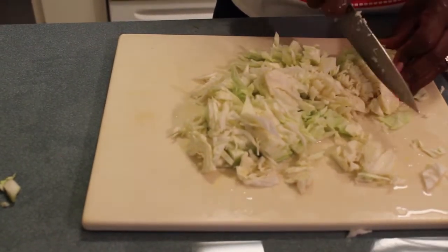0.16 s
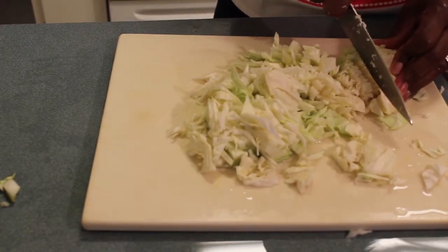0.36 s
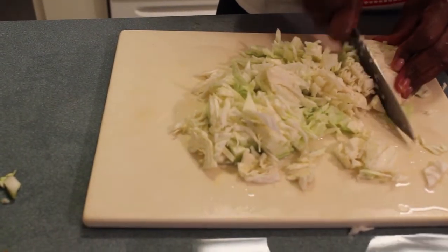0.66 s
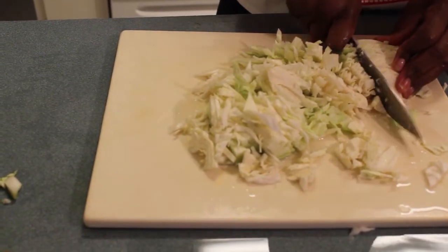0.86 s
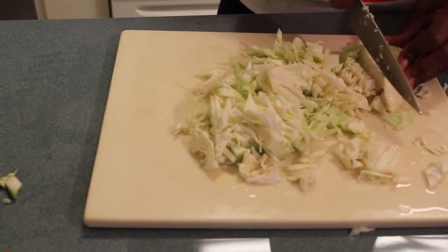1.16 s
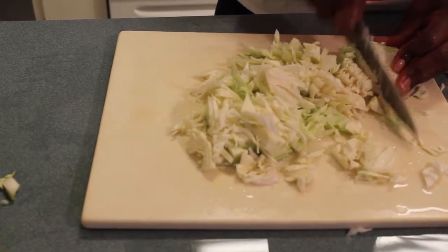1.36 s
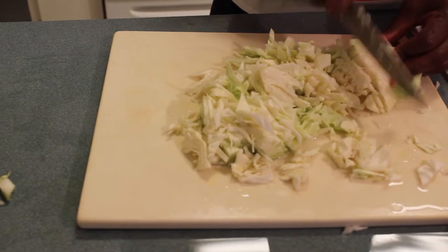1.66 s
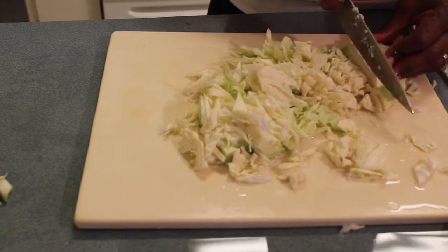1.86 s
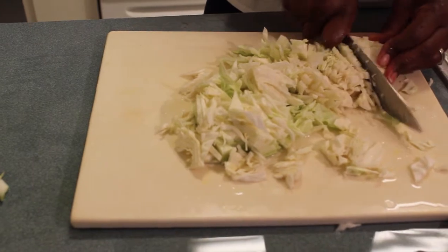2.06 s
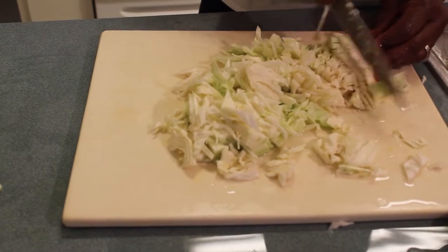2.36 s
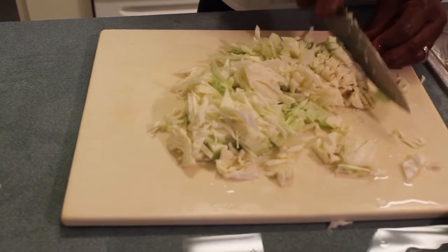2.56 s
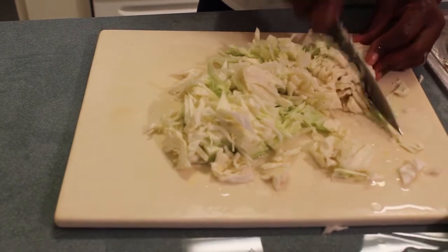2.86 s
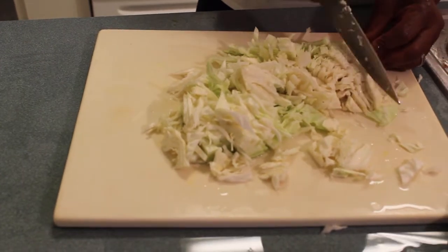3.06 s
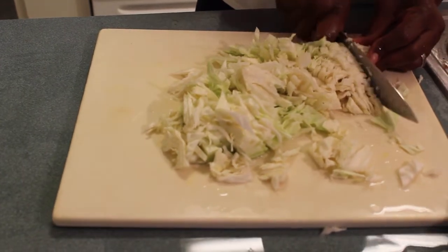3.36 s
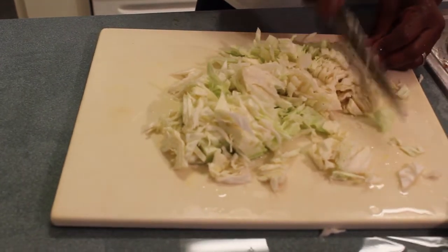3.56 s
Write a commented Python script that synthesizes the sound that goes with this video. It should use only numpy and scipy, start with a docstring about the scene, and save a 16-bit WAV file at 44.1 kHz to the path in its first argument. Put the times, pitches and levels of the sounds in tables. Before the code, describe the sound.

Knife slicing cabbage on a plastic board, crisp crunches, soft thumps, then two loud board knocks.

```python
"""Five crunchy strokes of a large knife through cabbage on a plastic board, close by, in a kitchen with a fan.
Leaves crunch as swarms of filtered clicks, and the board rumbles and booms with clicks and dying sines.
Light taps, grinding, a singing blade and rustling shreds fill in the detail.
Strokes four and five end in hard knocks: cracks, clacks and ringing that overload the microphone
and make its automatic gain turn down."""
import sys
import numpy as np
from scipy import signal
from scipy.fft import rfft, irfft
from scipy.io import wavfile
from scipy.ndimage import uniform_filter1d

SR = 44100
rng = np.random.default_rng(int(sys.argv[2]) if len(sys.argv) > 2 else 0)


def int16_out(signal):
    """Quantize to a 16-bit WAV file."""
    q = np.round(np.clip(np.atleast_2d(signal).T, -1, 1) * 32767)
    wavfile.write(sys.argv[1], SR, q.astype(np.int16))


N = 163170  # length in samples, 3.7 s

# Levels in the tables are relative: filters, mix levels, the room and the microphone gain follow.
# One list per knife stroke. Each row: time in seconds, leaf crunch in dB, shove on the board in dB.
STROKES = [
    [(0.46, -47, -44), (0.538, -30, -21), (0.568, -36, -21), (0.584, -27.5, -26.5), (0.678, -30, -24.5),
     (0.712, -26.5, -43), (0.776, -26.5, -29), (0.804, -41.5, -16.5), (0.84, -46, -38)],
    [(1.28, -56, -21), (1.29, -38.5, -31), (1.346, -35, -32.5), (1.382, -23, -17), (1.432, -15.5, -25.5),
     (1.454, -24.5, -19.5), (1.484, -25, -32), (1.514, -40, -17.5), (1.54, -54, -26)],
    [(1.92, -41.5, -40), (1.95, -36, -38), (1.962, -44.5, -29), (2.002, -29, -34), (2.014, -17.5, -30),
     (2.044, -19.5, -20.5), (2.106, -18.5, -21.5), (2.126, -32, -35), (2.18, -47, -35)],
    [(2.52, -42, -40), (2.54, -32, -49), (2.564, -28, -35), (2.574, -31.5, -21.5), (2.602, -29, -34),
     (2.606, -22, -36), (2.632, -24, -16.5), (2.698, -17.5, -24)],
    [(3.19, -63, -36), (3.21, -31.5, -30.5), (3.244, -21.5, -23), (3.26, -17.5, -17), (3.276, -18.5, -16.5),
     (3.316, -19, -21), (3.36, -18, -19), (3.388, -19, -31), (3.398, -16.5, -26)],
]
# Tone of the snapping leaves. Each row: frequency in Hz, level in dB.
LEAF_TONE = [(240, -10.5), (400, -5), (515, -18), (580, -3), (625, -5.5), (962, -12.5), (1530, -1),
             (1940, -6.5), (2120, 3), (2490, 0), (3210, 1), (3950, -3.5), (7280, 2), (8320, -3),
             (14000, -31)]
# Edges of the pitch bands for fibres of different sizes, in Hz.
FIBRE_BANDS_HZ = [200, 900, 1700, 2600, 3700, 5000, 6300, 7600, 9500, 15500]
# Tone of the shoved board. Each row: frequency in Hz, level in dB.
BOARD_TONE = [(20, -30), (32, -32), (48, -15.5), (70, -11.5), (105, -6.5), (124, 4.5), (136, 4), (150, 1),
              (175, -12.5), (215, -14.5), (260, -6), (320, -16.5), (600, -23), (1500, -59)]
# Hard knocks on the bare board. Each row: start in seconds, crack in dB, clack of the edge in dB,
# ring of the board in dB, thump in dB.
KNOCKS = [(2.7039, 28, 3, -17, -14), (3.4033, 31, 5, 4, -5.5)]
# Tone of the sharp crack. Each row: frequency in Hz, level in dB.
CRACK_TONE = [(200, -34.5), (500, -5.5), (800, -1), (1200, -7), (1700, -4.5), (2700, 4), (3400, -13),
              (5200, -19), (8000, -19), (15000, -47)]
# Tone of the edge's clack. Each row: frequency in Hz, level in dB.
CLACK_TONE = [(200, -10), (350, -10), (500, -9.5), (780, -6), (1000, -14.5), (1300, -9.5), (1680, -0.5),
              (1900, -10), (2200, 2.5), (2700, -5), (3100, -5), (4000, -9), (5500, -10.5), (8000, -39),
              (15000, -57)]
# Ringing tones of the struck board. Each row: frequency in Hz, level in dB, time to fade 60 dB in seconds.
BOARD_RING = [(248, -4, 0.096), (323, -15, .04), (398, -4.5, 0.11), (452, -4.5, 0.066), (592, 13.5, 0.039),
              (694, 2, 0.038), (754, -10, 0.025), (789, 1.5, 0.089), (1006, -1, 0.045)]
# Boom of the board on the counter, before the pitch varies. Each row: frequency in Hz, level in dB,
# time to fade 60 dB in seconds.
THUMP_TONES = [(53, -9, 0.071), (110, -5.5, 0.085), (131, 3.5, 0.13), (189, -14, 0.046),
               (256.4, -14.5, 0.1)]
# Light contacts of blade and cabbage. Each row: start in seconds, tick in dB,
# time for the tick to fade 60 dB in seconds, board thump in dB.
TAPS = [(0.112, -22.5, 0.063, -14.5), (0.2, -32, 0.074, -17), (0.2836, -33.5, 0.023, -29),
        (.326, -33.5, 0.089, -42), (.587, -15.5, 0.016, -21), (.792, -40, .03, -12.5),
        (0.9518, -37.5, 0.044, -25.5), (1.1803, -21.5, 0.052, -16), (1.249, -33.5, 0.02, -39),
        (1.2841, -30, 0.068, -19), (1.439, -17, 0.09, -11), (1.7237, -35, .04, -35),
        (1.756, -37.5, 0.053, -51), (1.8228, -26, 0.1, -17.5), (1.947, -26.5, 0.039, -18),
        (1.98, -27, 0.048, -42), (2.0099, -18, 0.033, -20), (2.2691, -27.5, 0.034, -40),
        (2.369, -36.5, 0.066, -45), (2.4474, -24, 0.048, -16.5), (2.5217, -22.5, 0.014, -44),
        (2.557, -20, .05, -27), (2.608, -16.5, .03, -25), (2.889, -30.5, 0.091, -42),
        (3.0702, -27, .05, -10), (3.1575, -29.5, 0.11, -20.5), (3.262, -32, .03, -13)]
# Tone of ticks and of rustling shreds. Each row: frequency in Hz, level in dB.
TICK_TONE = [(300, -50), (1200, -3), (2700, 4.5), (4200, -0.5), (7000, 2.5), (9500, -8.5), (12000, -18),
             (15000, -51)]
# The edge grinds through the last leaves onto the board. Each row: start in seconds,
# time to fade 60 dB in seconds, level in dB.
GRINDS = [(0.745, 0.53, -27.5), (.797, 0.19, -24.5), (1.464, 0.19, -19), (1.495, 0.18, -25),
          (1.52, 0.36, -30), (2.102, 0.19, -22.5)]
# Tone of the grinding. Each row: frequency in Hz, level in dB.
GRIND_TONE = [(120, -8.5), (250, 4.5), (470, 3), (750, 4), (1100, 1.5), (1900, -2.5), (3000, -11),
              (6000, -35), (15000, -55)]
# The blade rubs through the dense heart. Each row: start in seconds, length in seconds, level in dB.
RUBS = [(0.514, 0.196, -37), (0.689, 0.11, -28), (1.355, 0.061, -34), (2.549, 0.03, -21),
        (2.615, 0.024, -17), (2.651, 0.045, -31), (3.232, 0.057, -27), (3.295, .03, -21.5),
        (3.323, 0.085, -35)]
# Tone of the singing blade. Each row: frequency in Hz, level in dB.
BLADE_TONE = [(300, -57), (1400, -18.5), (1850, -7), (2130, 9), (2350, -6), (2560, 4.5), (2850, -9),
              (3150, -4), (3800, -14), (6000, -42), (15000, -67)]
# Loudness of the loose shreds. Each row: time in seconds, level in dB.
RUSTLE_LEVEL = [(.1, -60), (.3, -46), (.35, -46), (.45, -49), (.85, -45.5), (1.1, -65), (1.3, -43.5),
                (1.6, -46.5), (1.7, -55), (1.881, -44), (2.24, -50), (2.32, -46), (2.48, -54), (2.95, -50),
                (3.05, -53.5), (3.18, -37.5), (3.45, -56), (3.69, -57)]
# How long the room's tail lasts. Each row: frequency in Hz, time to fade 60 dB in seconds.
ROOM_FADE = [(100, 0.57), (250, 1), (660, 1), (1740, 0.81), (2600, 0.65), (4600, 0.69), (9000, 0.33),
             (15000, 0.82)]
# Tone of the kitchen fan. Each row: frequency in Hz, level in dB.
FAN_TONE = [(15, -50), (28, -36), (50, 3), (78, -31), (100, -6.5), (116, 5.5), (145, -1.5), (175, 2.5),
            (210, -5), (250, -2), (460, -7.5), (700, -9.5), (1250, -8), (1750, -17), (3000, -21),
            (4500, -29.5), (7800, -27), (10000, -45), (15000, -58)]

SNAPS_PER_S, SNAP_SPREAD_DB = 2200, 2.5  # rate for the band that ends at 5 kHz; others are scaled
CRUNCH_DB, SHOVE_DB, CUT_RELEASE_S = -0.5, -1.5, 0.0039
CLUMP_S, CLUMP_DB = 0.003, 1.93  # unevenness: the blade goes through one leaf after another
CLACK_T60_S, BOARD_RISE_S = 0.043, 0.0037
BOUNCE_S, BOUNCE_DB = 0.014, -0.5  # the heel of the blade comes down just after the edge
THUMP_RISE_S = 0.006
THUMP_SCATTER = 0.031  # share by which pitch varies with where the board is pressed
RUSTLES_PER_S, RUSTLE_SPREAD_DB = 700, 0.5
ROOM_DB, EARLY_DB, EARLY_T60_S = -13.5, -11, 0.3
FAN_DB = -37
LOW_CUT_HZ, EDGE_HZ = 42, 15700  # lower and upper limit of the sound
LIMIT_DB, DUCK_SHARE = -9.5, 0.65  # above the limit, this share of the excess is turned down
RECOVER_DB_PER_S, DUCK_ATTACK_S = 13, 0.009
START_DUCK_DB = 6  # the gain is still recovering when the scene opens
CLIP_AT = 1.05


def amp(db):
    """Turns decibels into a gain."""
    return 10 ** (np.asarray(db) / 20)


def evened(x):
    """Scales a sound to an rms of one."""
    return x / np.sqrt(np.mean(x ** 2) + 1e-20)


def read(points, hz):
    """Reads a table between its points, on a log-frequency axis."""
    f, value = np.transpose(points)
    return np.interp(np.log(hz + 1), np.log(f + 1), value)


def add(mix, s, sound):
    """Mixes a sound in at time s, in seconds."""
    part = mix[round(s * SR):][:len(sound)]
    part += sound[:len(part)]


def colour(x, spectrum, size=4096):
    """Gives a sound a tone with a filter of unit energy that never responds ahead of its input."""
    hz = abs(np.fft.fftfreq(size, 1 / SR))
    log_gain = np.log(amp(read(spectrum, hz)))
    # the Hilbert transform finds the phase that puts the energy first
    response = np.exp(np.conj(signal.hilbert(log_gain)))
    taps = np.fft.ifft(response).real[:size // 2]
    return signal.fftconvolve(x, taps / np.linalg.norm(taps))[:len(x)]


def snaps(count, per_s, spread_db):
    """Makes random clicks of uneven size, with an rms of one."""
    size = amp(spread_db * np.minimum(rng.exponential(1, count), 4))
    sign = rng.choice([-1, 1], count)
    happens = rng.random(count) < per_s / SR
    return evened(size * sign * happens)


def burst(spectrum, t60):
    """A cluster of tiny clicks that fades by 60 dB in t60 seconds."""
    t = np.arange(SR // 2) / SR
    clicks = snaps(len(t), per_s=12000, spread_db=1.0)
    return colour(clicks * amp(-60 * t / t60), spectrum)


def ring(modes, rise_s, pitch=1):
    """Dying sines of a struck body that takes a moment to get moving."""
    t = np.arange(SR // 2) / SR
    sines = np.zeros(len(t))
    for hz, db, t60 in modes:
        phase = rng.random()
        sines += amp(db - 60 * t / t60) * np.sin(2 * np.pi * (hz * pitch * t + phase))
    return sines * (1 - np.exp(-(t / rise_s) ** 2))


def thump():
    """The board's low boom under a cushioned push."""
    pitch = 1 + THUMP_SCATTER * rng.uniform(-1.05, 1)
    return ring(THUMP_TONES, THUMP_RISE_S, pitch)


def cutting():
    """Leaf fibres snap by the thousand while the uneven push shakes the board."""
    t = np.arange(N) / SR
    crunch, shove = np.zeros(N), np.zeros(N)
    for stroke in STROKES:
        s, crunch_db, shove_db = np.transpose(stroke)
        inside = (t > s[0]) & (t < s[-1] + CUT_RELEASE_S)
        crunch += inside * amp(np.interp(t, s, crunch_db))
        shove += inside * amp(np.interp(t, s, shove_db))
    slow_noise = uniform_filter1d(rng.standard_normal(N), max(int(CLUMP_S * SR), 1))
    clumps = evened(amp(CLUMP_DB * evened(slow_noise)))
    leaves = colour(crunch * clumps * fibres(), LEAF_TONE)
    board = colour(shove * snaps(N, per_s=900, spread_db=1.5), BOARD_TONE)
    return amp(CRUNCH_DB) * leaves + amp(SHOVE_DB) * board


def fibres():
    """Snaps of many fibres, each in a pitch band for its size; thick, low ones are rarer."""
    out = np.zeros(N)
    for lo, hi in zip(FIBRE_BANDS_HZ, FIBRE_BANDS_HZ[1:]):
        share = (hi / 5000) ** 0.7
        band = signal.butter(2, [lo, hi], "band", fs=SR, output="sos")
        out += signal.sosfilt(band, snaps(N, SNAPS_PER_S * share, SNAP_SPREAD_DB))
    return evened(out)


def knocks():
    """The edge breaks through and strikes the bare board; the heel follows."""
    out = np.zeros(N)
    crack = colour(signal.unit_impulse(SR // 10), CRACK_TONE)
    for s, crack_db, clack_db, board_db, thump_db in KNOCKS:
        add(out, s, amp(crack_db) * crack)
        add(out, s, amp(clack_db) * burst(CLACK_TONE, CLACK_T60_S))
        add(out, s, amp(thump_db) * thump())
        for delay, db in (0, board_db), (BOUNCE_S, board_db + BOUNCE_DB):
            board = ring(BOARD_RING, BOARD_RISE_S) / np.sqrt(len(BOARD_RING))
            add(out, s + delay, amp(db) * board)
    return out


def contacts():
    """Light taps tick and push the board; soft landings grind on it."""
    out = np.zeros(N)
    for s, tick_db, t60, thump_db in TAPS:
        add(out, s, amp(tick_db) * burst(TICK_TONE, t60))
        add(out, s, amp(thump_db) * thump())
    for s, t60, db in GRINDS:
        add(out, s, amp(db) * burst(GRIND_TONE, t60))
    return out


def rubbing():
    """Friction drives the damped resonances of the blade, so it sings."""
    push = np.zeros(N)
    for s, length, db in RUBS:
        add(push, s, amp(db) * signal.windows.tukey(int(length * SR), 0.5))
    return colour(push * snaps(N, per_s=3000, spread_db=6), BLADE_TONE)


def rustling():
    """Cut shreds slide off the blade and settle, as many small clicks."""
    level = amp(np.interp(np.arange(N) / SR, *np.transpose(RUSTLE_LEVEL)))
    return colour(level * snaps(N, RUSTLES_PER_S, RUSTLE_SPREAD_DB), TICK_TONE)


def kitchen(x):
    """Adds quick reflections from counter and cupboards, and the room's tail."""
    t = np.arange(SR) / SR
    early = snaps(SR, per_s=2000, spread_db=2.0) * amp(-60 * t / EARLY_T60_S) * (t > 0.003)
    noise = rng.standard_normal(SR) * np.minimum(t / 0.0067, 1)  # the tail swells in
    hz, when, z = signal.stft(noise, SR, nperseg=256)
    fade = amp(-60 * when / read(ROOM_FADE, hz)[:, None])  # each frequency dies at its own rate
    tail = signal.istft(z * fade, SR, nperseg=256)[1][:SR]
    echo = amp(EARLY_DB) * early / np.linalg.norm(early)
    echo = echo + amp(ROOM_DB) * tail / np.linalg.norm(tail)
    return x + signal.fftconvolve(x, echo)[:N]


def fan():
    """Steady rush of air in the room: noise shaped by frequency."""
    gain = amp(read(FAN_TONE, np.fft.rfftfreq(N, 1 / SR)))
    air = irfft(rfft(rng.standard_normal(N)) * gain, N)
    return amp(FAN_DB) * evened(air)


def scene():
    """Knife, cabbage and board echo in the kitchen over the fan."""
    sources = cutting() + knocks() + contacts() + rubbing() + rustling()
    return (kitchen(sources) + fan())[None]


def record(dry):
    """Low cut; gain control reacts too late to the knocks, which clip; then the upper limit."""
    low_cut = signal.butter(2, LOW_CUT_HZ, "high", fs=SR, output="sos")
    x = signal.sosfilt(low_cut, dry)
    power = abs(signal.lfilter(np.ones(256) / 256, 1, x[0] ** 2))
    level_db = 10 * np.log10(power + 1e-12)
    # the running maximum holds each duck; taking the fall away again lets it recover steadily
    fall = np.arange(N) / SR * RECOVER_DB_PER_S
    wanted_db = np.maximum(DUCK_SHARE * (level_db - LIMIT_DB) + fall, START_DUCK_DB)
    duck_db = np.maximum(np.maximum.accumulate(wanted_db) - fall, 0)
    lag = np.exp(-1 / (DUCK_ATTACK_S * SR))
    ducked = x * amp(-signal.lfilter([1 - lag], [1, -lag], duck_db))
    clipped = np.clip(ducked, -CLIP_AT, CLIP_AT)
    high_cut = signal.firwin(511, EDGE_HZ, window=("kaiser", 8), fs=SR)
    return signal.oaconvolve(clipped, high_cut[None], "same")


dry = scene()
out = record(dry)
int16_out(out)
```